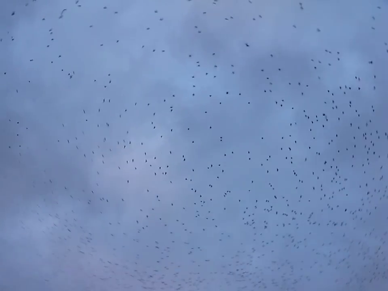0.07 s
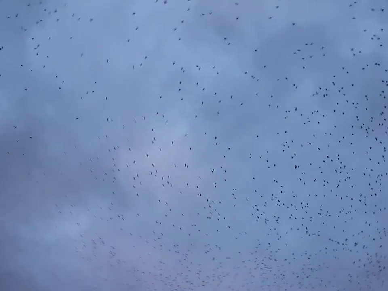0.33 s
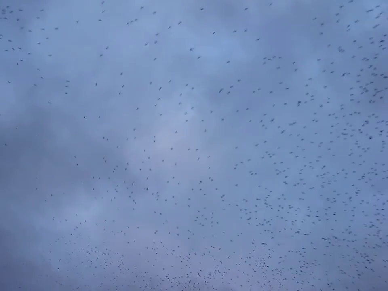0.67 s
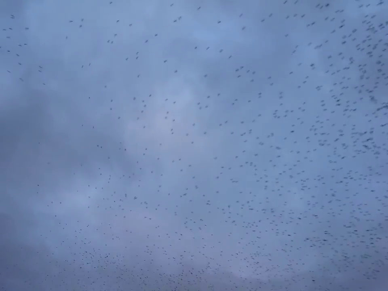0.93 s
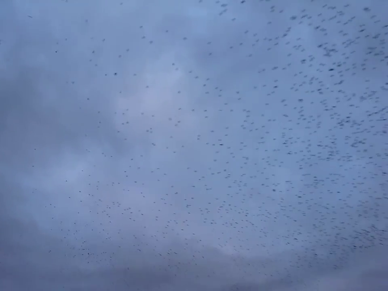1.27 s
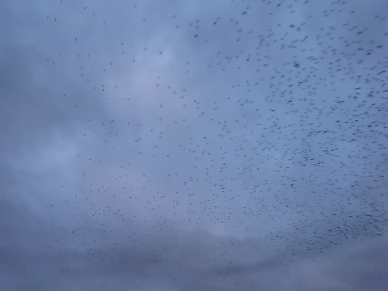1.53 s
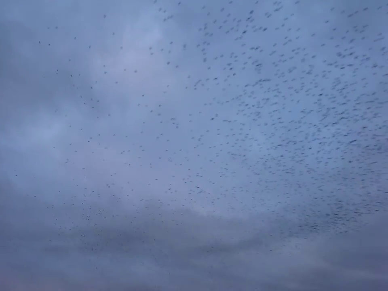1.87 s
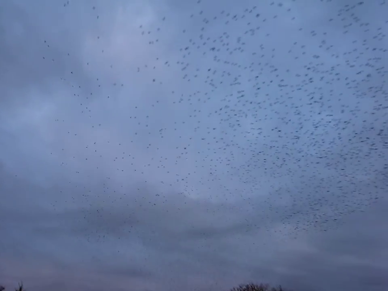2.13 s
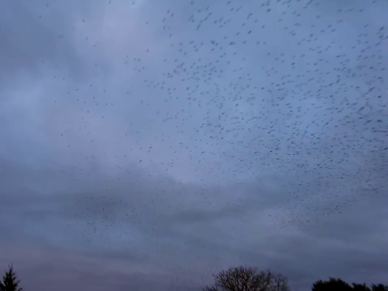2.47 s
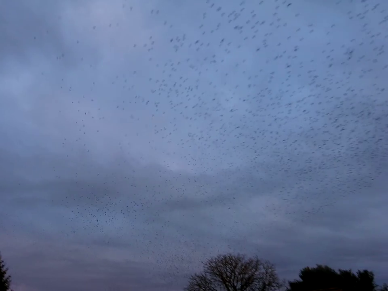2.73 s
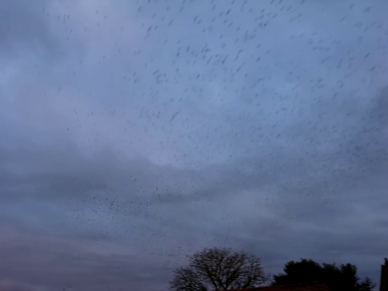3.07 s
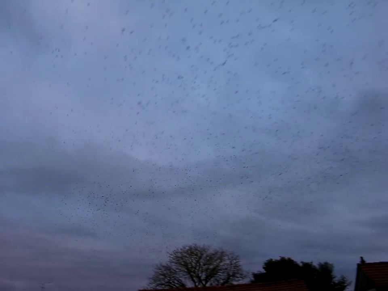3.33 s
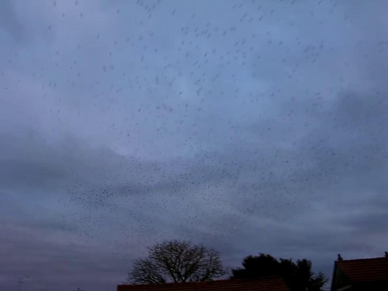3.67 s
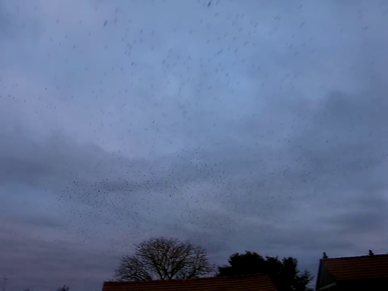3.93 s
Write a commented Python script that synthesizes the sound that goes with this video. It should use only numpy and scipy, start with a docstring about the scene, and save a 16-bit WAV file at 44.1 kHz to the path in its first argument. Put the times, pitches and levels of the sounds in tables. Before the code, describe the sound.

Countless wingbeats merge into a swelling rush over light microphone wind and far traffic hum.

```python
"""A huge flock of small birds streams overhead at dusk, heard by one microphone, the same in both ears.
At first, wind bumps the microphone while countless wingbeats merge into a rush and far traffic hums.
Near 1.4 s comes more wind, and cloth brushes close by. The rush swells and brightens as the nearest
birds pass, peaking at 2.2 to 2.5 s amid more brushes of cloth. It then eases, wind bumps again
near 3.4 s, and the rush brightens once more at the end."""
import sys
import numpy as np
from scipy import signal
from scipy.io import wavfile

SR = 44100
rng = np.random.default_rng(int(sys.argv[2]) if len(sys.argv) > 2 else 0)


def materialize(psi):
    """Save the field psi as 16-bit PCM at rate SR to the path in sys.argv[1].

    A 1-D psi becomes a single channel; in a 2-D psi each row is a channel.
    """
    bounded = np.clip(np.atleast_2d(psi).T, -1, 1)
    quanta = np.round(bounded * 32767).astype(np.int16)
    wavfile.write(sys.argv[1], SR, quanta)


N = 176400  # 4 seconds
TIME = np.arange(N) / SR


def from_db(db):
    """Turn decibels into a number to multiply a sound by."""
    return 10 ** (np.asarray(db) / 20)


def rms_one(x):
    """Scale a signal so that its average strength (rms) is 1."""
    return x / np.sqrt(np.mean(x ** 2) + 1e-20)


def level(rows, trim_db):
    """Loudness over time: join the (time_s, level_db) points and add trim_db to them all."""
    return from_db(np.interp(TIME, *np.transpose(rows)) + trim_db)


def swell(middle_s, spread_s):
    """A bell-shaped rise and fall, at about 60% of its height spread_s before and after the middle."""
    return np.exp(-.5 * ((TIME - middle_s) / spread_s) ** 2)


def noise_band(low_hz, high_hz, order=2):
    """Noise between two pitches; a higher order gives sharper edges."""
    edges_hz = [max(low_hz, 10), min(high_hz, .45 * SR)]
    bandpass = signal.butter(order, edges_hz, "band", fs=SR, output="sos")
    noise = rng.standard_normal(N + SR // 4)  # the extra lets the filter settle
    return rms_one(signal.sosfilt(bandpass, noise)[-N:])


def wingbeats(birds, beats_per_s=12, rate_spread=0.1518, sharpness=5.5, pass_s=0.37):
    """A flutter curve: each bird flaps at its own speed and stands out briefly as it passes."""
    t = TIME[::100]
    speed, phase, place = np.hsplit(rng.random((birds, 3)), 3)
    rate_hz = beats_per_s * np.exp(rate_spread * (2 * speed - 1))
    strokes = np.exp(sharpness * (np.cos(2 * np.pi * (rate_hz * t + phase)) - 1))
    strokes -= strokes.mean(axis=1, keepdims=True)
    nearness = 1 / (1 + ((t - place * t[-1]) / pass_s) ** 2)
    return rms_one(np.interp(TIME, t, (strokes * nearness).sum(axis=0)))


def rush(tone, bands, flutter=0):
    """Noise bands as strong as a tone table says; wingbeats can make them flutter, partly together."""
    pitch_hz, strength_db = np.transpose(tone)
    edges_hz = np.geomspace(pitch_hz[0], pitch_hz[-1], bands + 1)
    shared_beats = wingbeats(birds=40)
    out = 0
    for low, high in zip(edges_hz, edges_hz[1:]):
        band_db = np.interp(np.log(low * high) / 2, np.log(pitch_hz), strength_db)
        if flutter:
            band_db += flutter * (.5 * shared_beats + wingbeats(birds=16))
        gain = np.sqrt(high - low) * from_db(band_db)  # wider bands carry more sound
        out += gain * noise_band(low, high, order=3)
    return rms_one(out)


# How loud each far sound is, before its trim: time_s, level_db
ROAR_LEVEL = [(0.0, -43.5), (0.17, -41.5), (0.21, -43.5), (1.6, -43), (2.14, -40), (2.87, -41.5),
              (3.22, -43), (4.0, -43.5)]
MURMUR_LEVEL = [(0.0, -54), (0.13, -53.5), (0.91, -56.5), (1.27, -53), (3.01, -52.5), (3.45, -49),
                (4.0, -48.5)]
RUMBLE_LEVEL = [(0.35, -63.5), (0.99, -61.5), (1.37, -56.5), (1.76, -63), (2.24, -59), (2.67, -62.5),
                (3.36, -58.5), (3.48, -54.5), (3.95, -59.5)]
# Which pitches are strong in each: pitch_hz, relative_level_db
ROAR_TONE = [(400, -30), (480, -12), (570, -6), (630, -6.5), (720, -1.5), (850, -1), (950, 1.5), (1080, 0),
             (1250, -5.5), (1800, -24)]
MURMUR_TONE = [(130, -15), (200, -2.5), (240, 2), (310, 1), (380, -1), (480, 1), (620, -1.5), (900, -11)]
RUMBLE_TONE = [(25, -22), (38, -15), (48, -14), (60, 4.5), (75, 0.5), (95, -1), (135, 4.5), (165, -0.5),
               (240, -14)]


def far_background():
    """Far tyres and far birds roar, wind and road murmur, and a deep rumble lies underneath."""
    roar = level(ROAR_LEVEL, trim_db=-0.22) * rush(ROAR_TONE, bands=20, flutter=0.7)
    murmur = level(MURMUR_LEVEL, trim_db=1.5) * rush(MURMUR_TONE, bands=10)
    rumble = level(RUMBLE_LEVEL, trim_db=2.5) * rush(RUMBLE_TONE, bands=14)
    return roar + murmur + rumble


# Notes of far engines and tyres: middle_s, spread_s, pitch_hz, width_hz, level_db
TRAFFIC_NOTES = [(.65, 0.29, 698, 13, -52.5), (0.84, 0.71, 139, 7, -62.5), (.9, 0.56, 312, 5.6, -68.5),
                 (1.346, 0.19, 563, 15, -54), (2.85, 0.24, 933, 180, -47), (2.9, 0.43, 176, 7.4, -63),
                 (3.26, 0.28, 238, 13, -62.5), (3.85, .2, 178, 7.8, -57)]


def traffic_hum():
    """Engines and tyres drift in and out, each a band of noise narrow enough to sound like a note."""
    out = 0
    for middle_s, spread_s, pitch_hz, width_hz, level_db in TRAFFIC_NOTES:
        note = noise_band(pitch_hz - width_hz / 2, pitch_hz + width_hz / 2)
        out += from_db(level_db) * swell(middle_s, spread_s) * note
    return out


# Gusts on the microphone: middle_s, spread_s, level_db
GUSTS = [(.04, 0.042, -45.5), (.2, 0.051, -50), (1.35, 0.055, -53.5), (1.462, .018, -53), (3.452, .02, -44)]
# Short puffs of wind, before their trim: middle_s, level_db, pitch_hz
PUFFS = [(0.009, -30, 175), (0.04, -33.5, 113), (0.078, -34, 145), (0.159, -35.5, 130), (0.229, -40, 129),
         (1.34, -37, 121), (1.379, -48, 191), (1.46, -42, 112), (3.411, -34, 192), (3.429, -26, 170),
         (3.528, -31.5, 153), (3.628, -29.5, 120)]


def wind(puff_trim_db=-5, puff_spread_s=0.0059, puff_churn=0.34):
    """Gusts churn the air at the microphone; each puff is a soft, low bump a few waves long."""
    churn = noise_band(66, 280)
    gusts = sum(from_db(level_db) * swell(middle_s, spread_s) for middle_s, spread_s, level_db in GUSTS)
    out = gusts * noise_band(59, 208, order=3)
    for middle_s, level_db, pitch_hz in PUFFS:
        bump = np.sin(2 * np.pi * pitch_hz * (TIME - middle_s)) + puff_churn * churn
        out += from_db(level_db + puff_trim_db) * swell(middle_s, puff_spread_s) * bump
    return out


# Brushes of cloth: middle_s, level_db, spread_s, pitch_hz, width_octaves
BRUSHES = [(1.313, -57, .0025, 13000, .4), (1.372, -52.5, .009, 11540, .035), (1.4, -55, 0.022, 8900, .9),
           (1.399, -50, .016, 5600, 0.46), (1.987, -39.5, .002, 7300, 0.91),
           (1.995, -39, 0.0014, 8600, 0.46), (2.260, -37, 0.0014, 11800, .55),
           (2.264, -39.5, 0.0095, 4730, 0.98), (2.267, -38, 0.0019, 11800, .7),
           (2.472, -48, 0.025, 6500, 1.6)]


def cloth():
    """Cloth rubs near the microphone in short, bright scuffs."""
    out = 0
    for middle_s, level_db, spread_s, pitch_hz, width_octaves in BRUSHES:
        edge_ratio = 2 ** (width_octaves / 2)
        scuff = noise_band(pitch_hz / edge_ratio, pitch_hz * edge_ratio, order=3)
        out += from_db(level_db) * swell(middle_s, spread_s) * scuff
    return out


# How loud each part of the flock is, lowest part first, before its trim: time_s, level_db
WINGS_LEVEL = [(0.05, -46.5), (0.36, -44), (0.41, -47), (1.68, -41), (1.72, -43), (2.19, -36.5),
               (2.22, -39.5), (2.46, -36.5), (3.25, -43), (3.95, -41.5)]
SWISH_LEVEL = [(0.1, -51.5), (0.34, -51), (0.61, -53), (2.14, -44), (2.15, -43), (2.84, -45), (2.87, -47.5),
               (3.13, -47), (3.23, -48), (3.9, -43.5)]
FEATHER_LEVEL = [(0.03, -54.5), (0.7, -56.5), (1.31, -54.5), (1.89, -50.5), (2.31, -44.5), (2.5, -51),
                 (3.23, -53.5), (3.51, -53), (3.82, -49.5), (3.97, -50.5)]
FINE_HISS_LEVEL = [(0.03, -59), (1.05, -59), (1.82, -57), (2.17, -53.5), (2.32, -53), (2.5, -56),
                   (2.97, -56), (3.23, -58.5), (3.5, -58.5), (3.82, -55), (3.97, -55.5)]
# Which pitches are strong in each: pitch_hz, relative_level_db
WINGS_TONE = [(700, -18), (1000, -9), (1200, -3), (1400, 3), (1520, 1.5), (1690, 1), (1900, -4.5),
              (2150, -13.5), (2800, -20)]
SWISH_TONE = [(1500, -6.5), (1950, 2.5), (2250, 0), (2600, 0), (3000, -4), (3400, -5), (3900, -15),
              (4800, -28)]
FEATHER_TONE = [(2800, -4.5), (3500, 1), (4100, 1), (5100, 0.5), (6300, -2), (7000, -7), (8500, -12.5),
                (9500, -18), (11000, -23)]
FINE_HISS_TONE = [(6000, -5), (7300, 1), (8400, 1), (9500, 0), (11000, -1), (12500, -3), (14200, -5.5),
                  (15700, -12)]


def flock():
    """All the wings make a rush; close birds add a swish and feather hiss, with a finer hiss on top."""
    wings = level(WINGS_LEVEL, trim_db=0.3) * rush(WINGS_TONE, bands=16, flutter=0.9)
    swish = level(SWISH_LEVEL, trim_db=0.83) * rush(SWISH_TONE, bands=10, flutter=0.23)
    feathers = level(FEATHER_LEVEL, trim_db=1.5) * rush(FEATHER_TONE, bands=20, flutter=0.68)
    fine_hiss = level(FINE_HISS_LEVEL, trim_db=0.57) * rush(FINE_HISS_TONE, bands=10, flutter=0.5)
    return wings + swish + feathers + fine_hiss


def scene():
    """Everything reaches one microphone, so both ears get the same sound."""
    mix = flock() + far_background() + traffic_hum() + wind() + cloth()
    return np.tile(mix, (2, 1))


def record(dry):
    """Cut away the very highest pitches steeply."""
    cutoff_hz = 15750
    lowpass = signal.ellip(12, .1, 80, cutoff_hz, fs=SR, output="sos")
    return signal.sosfilt(lowpass, dry)


dry = scene()
out = record(dry)
materialize(out)
```